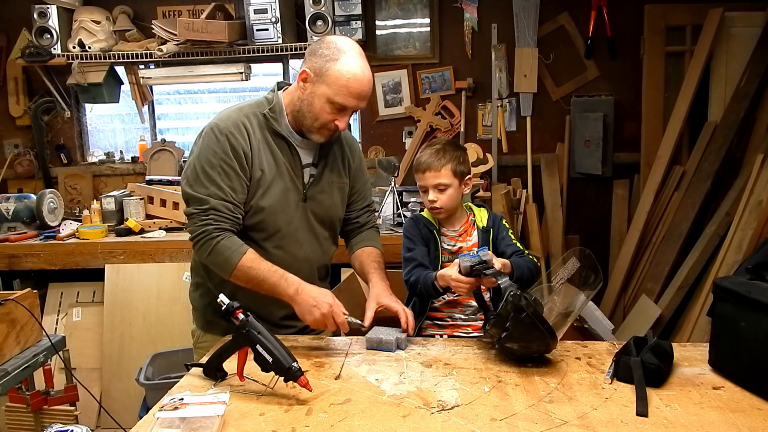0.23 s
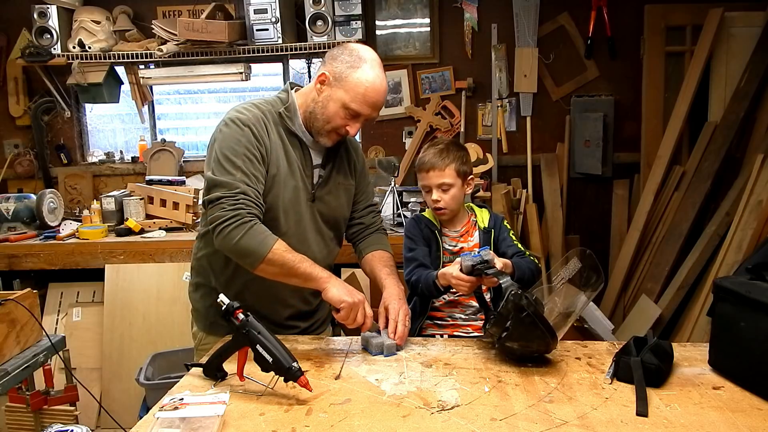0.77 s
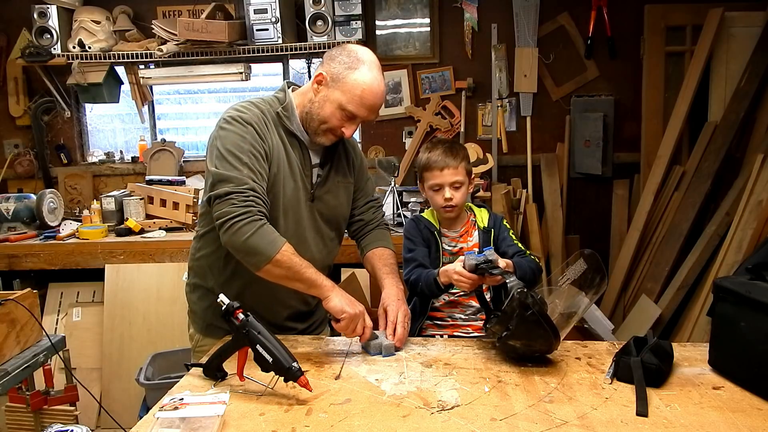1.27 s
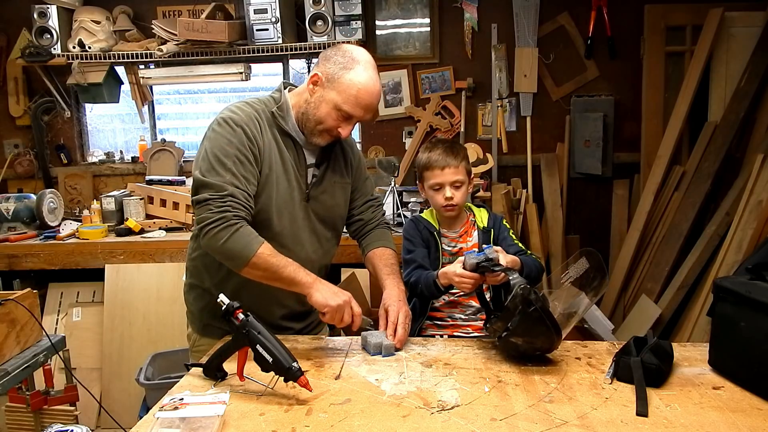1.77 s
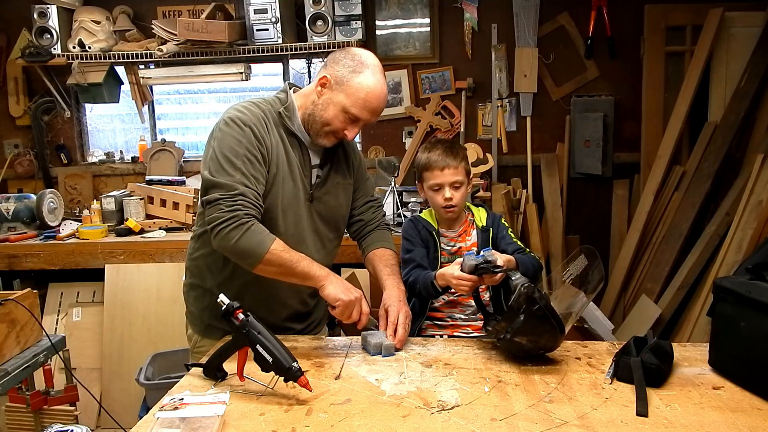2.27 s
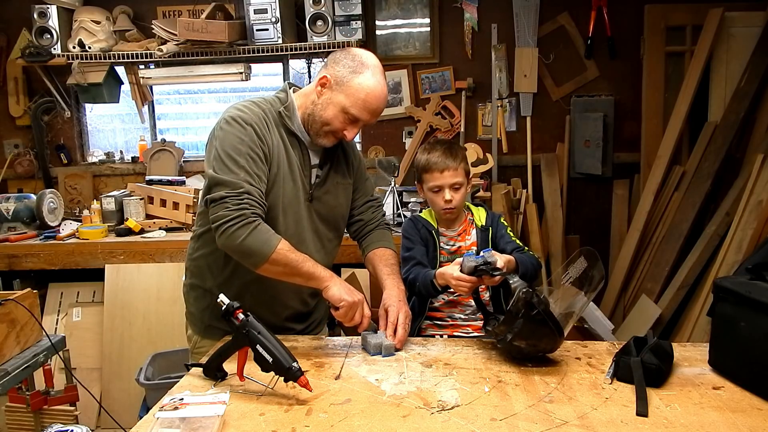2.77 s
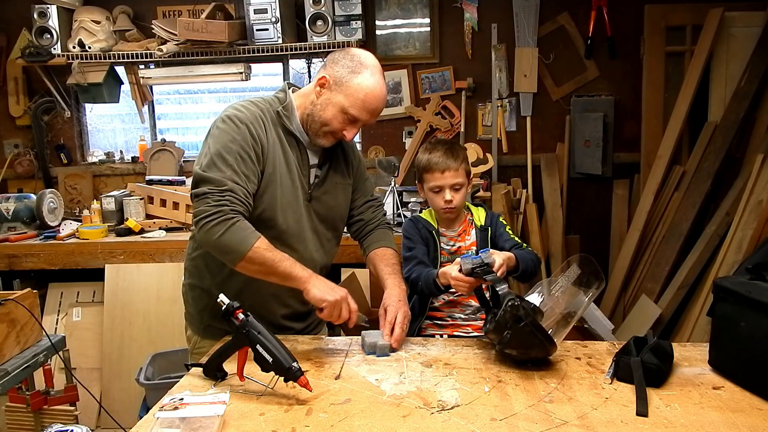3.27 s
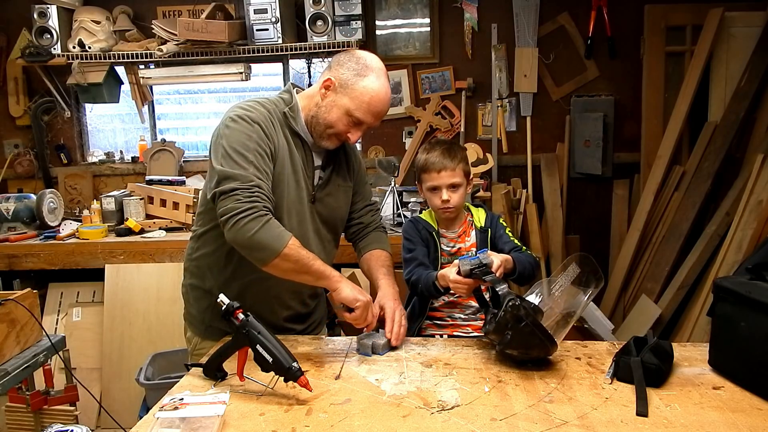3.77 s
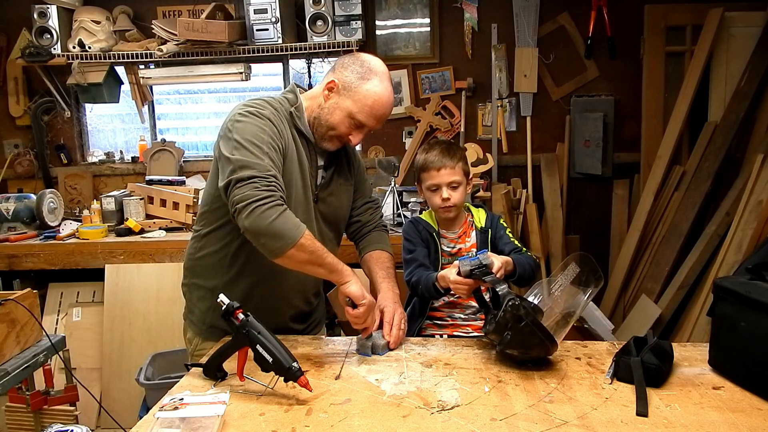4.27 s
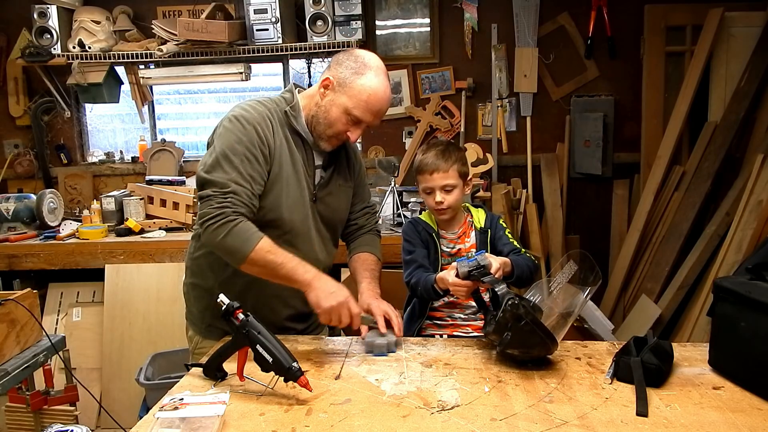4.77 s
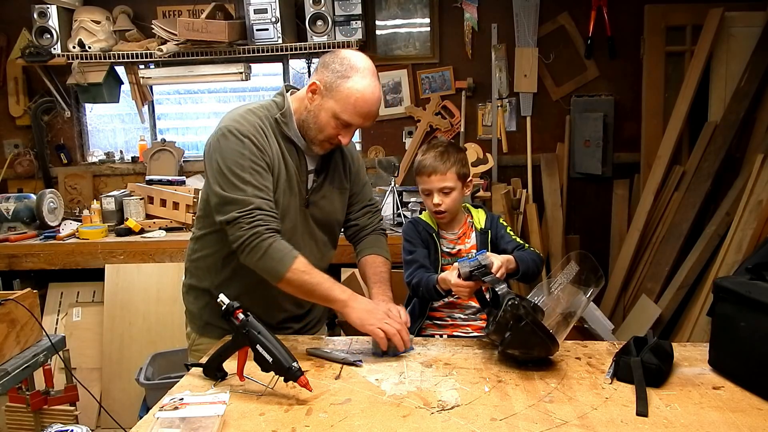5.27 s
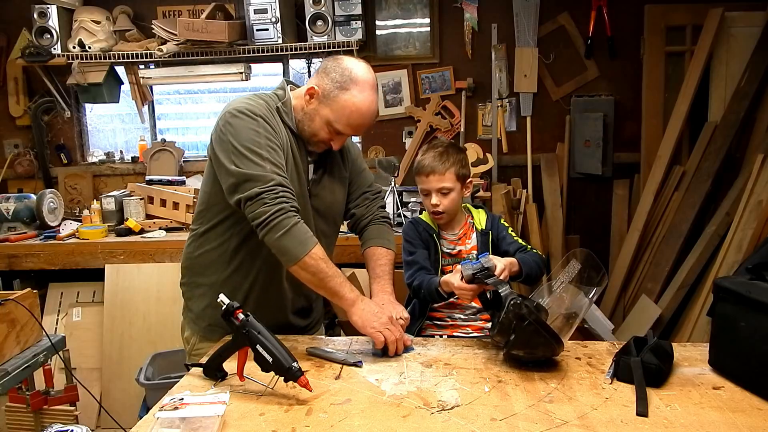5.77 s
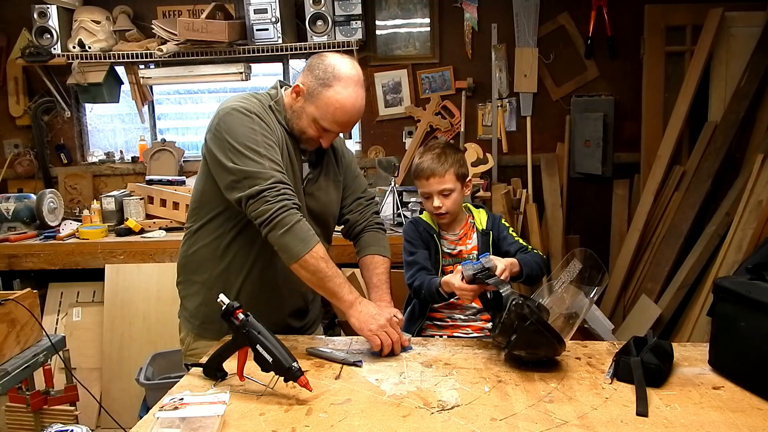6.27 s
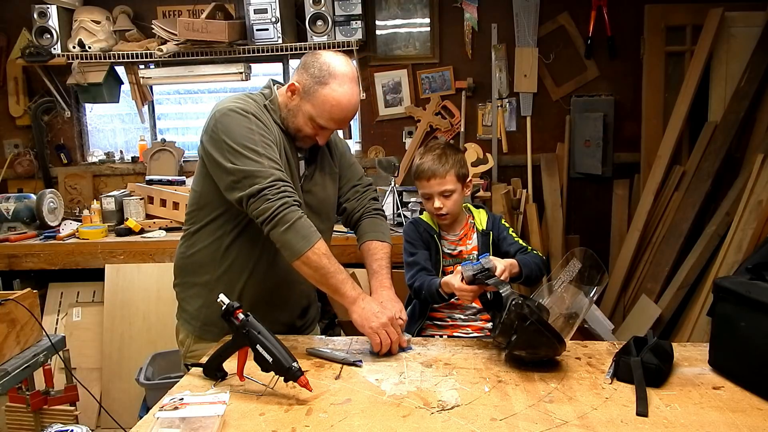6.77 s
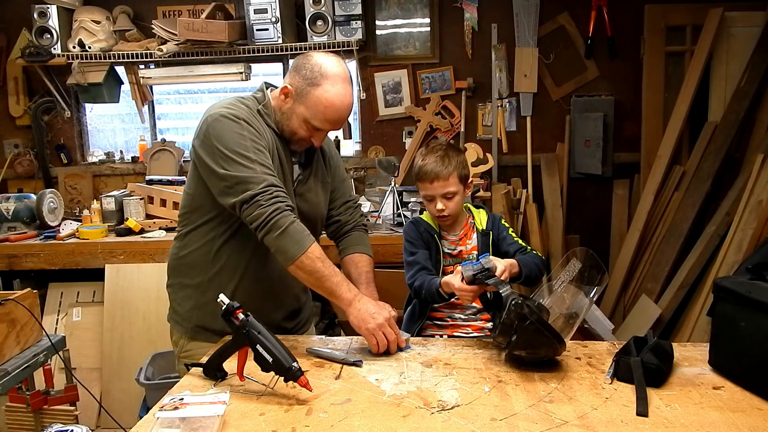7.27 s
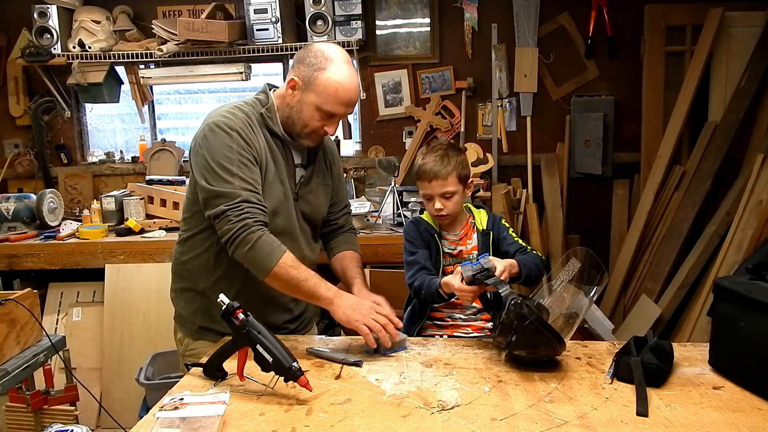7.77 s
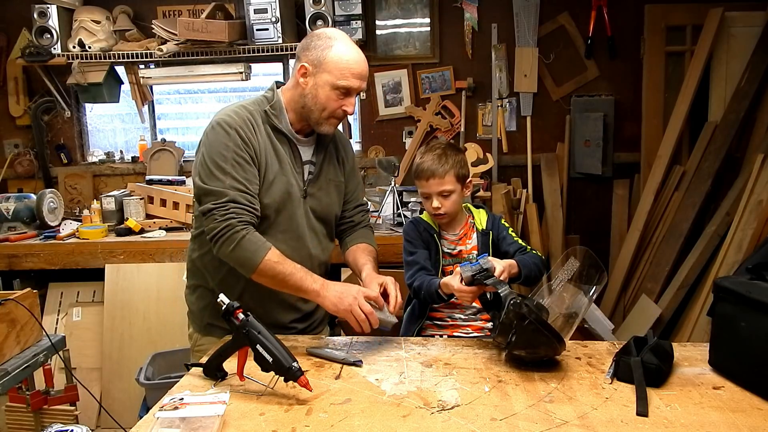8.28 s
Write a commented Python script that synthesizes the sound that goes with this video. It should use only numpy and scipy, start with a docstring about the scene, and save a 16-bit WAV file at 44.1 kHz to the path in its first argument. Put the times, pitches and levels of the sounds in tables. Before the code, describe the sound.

In a small workshop, close stereo microphones catch faint knocks and a brief squeaky scrape as a knife meets packing foam. Short gritty rasps and crisp snaps follow in irregular groups, with dull bench thumps. Around five seconds the knife is dropped with a loud rattling clatter of handle and blade on wood. Hands then crackle and pull the foam apart, with one strong snap, fading to light rustling over quiet room hum.

```python
"""Cutting packing foam

A small workshop with a wooden bench, heard on two close microphones: a knife saws and tears a foam block.
Strokes and snaps are random cell bursts and clicks, coloured as rasp, fizz and thud of the one block.
The knife is put down with a clatter (short pushes into wood and handle), then hands pull the pieces apart.
A thin whistle glides by early; filtered noise and low tones make the quiet air and hum,
and a short tail of sparse random echoes makes the room's answer."""
import sys
import numpy as np
from scipy import signal
from scipy.fft import rfft, irfft
from scipy.io import wavfile
from scipy.ndimage import uniform_filter1d

SR = 44100
rng = np.random.default_rng(int(sys.argv[2]) if len(sys.argv) > 2 else 0)


def int16_out(signal):
    """Quantize to a 16-bit WAV file."""
    q = np.round(np.clip(np.atleast_2d(signal).T, -1, 1) * 32767)
    wavfile.write(sys.argv[1], SR, q.astype(np.int16))


N = 375732
T = np.arange(N) / SR


def amp(db):
    """Turns dB into an amplitude factor."""
    return 10 ** (np.asarray(db) / 20)


def evened(x):
    """Scales to an rms of 1."""
    return x / np.sqrt(np.mean(x ** 2) + 1e-20)


def read(points, hz):
    """Reads a (frequency [Hz], value) table on a log-frequency axis."""
    f, value = np.transpose(points)
    return np.interp(np.log(hz + 1), np.log(f + 1), value)


def over_time(points):
    """Follows a (time [s], level [dB]) table through the scene, as amplitude."""
    return amp(np.interp(T, *np.transpose(points)))


def add(track, s, sound):
    """Mixes a sound into a track at time s."""
    part = track[max(round(s * SR), 0):][:len(sound)]
    part += sound[:len(part)]


def shaped(x, points, share=1):
    """Filters by a (frequency [Hz], gain [dB]) table without delay; share scales the dB."""
    size = x.shape[-1]
    gain = amp(share * read(points, np.fft.rfftfreq(size, 1 / SR)))
    return irfft(rfft(x) * gain, size)


def response(points, size=2048):
    """Causal (minimum-phase) impulse response, of energy 1, with a (frequency [Hz], gain [dB]) colour."""
    log_gain = np.log(amp(read(points, abs(np.fft.fftfreq(size, 1 / SR)))))
    taps = np.fft.ifft(np.exp(np.conj(signal.hilbert(log_gain)))).real
    return taps / np.linalg.norm(taps)


def ring(x, taps):
    """Plays a force through an impulse response."""
    return signal.oaconvolve(x, taps)[:N]


def wander(per_s):
    """Random values of rms 1, per_s of them a second, joined by straight lines."""
    knots = np.arange(0, T[-1] + 1, 1 / per_s)
    return evened(np.interp(T, knots, rng.standard_normal(len(knots))))


def bursts(per_s, spread_db):
    """Cells bursting at random: many small clicks and a few large, of rms 1 overall."""
    at = np.flatnonzero(rng.random(N) < per_s / SR)
    size, sign = rng.random((len(at), 2)).T
    clicks = np.zeros(N)
    clicks[at] = amp(spread_db * np.minimum(-np.log(size), 4)) * np.sign(sign - .5)
    return evened(clicks)


def crack(crumble, crumble_s, size=600):
    """One sharp click with a short crumbling tail of fading noise."""
    force = crumble * rng.standard_normal(size) * np.exp(-np.arange(size) / SR / crumble_s)
    force[0] = 1
    return force


# Spread of the two close microphones: (frequency [Hz], side against middle [dB])
SPREAD_WIDTH = [(60, -16), (250, -8.5), (500, -7), (1000, -5.5), (2000, -2.5), (4000, 0.5), (8000, 0),
                (14000, 1)]


def spread(middle, side):
    """Two close microphones: alike in the bass, unrelated in the treble."""
    side = shaped(side, SPREAD_WIDTH)
    return np.array([middle + side, middle - side])


# Colour of the workshop's steady air: (frequency [Hz], relative density [dB per Hz])
AIR_COLOUR = [(20, -16), (55, 1), (110, 1.5), (160, -8.5), (280, -9.5), (430, -16), (600, -17),
              (780, -14.5), (1000, -19), (1700, -19.5), (2200, -20), (3000, -24.5), (5000, -30),
              (7500, -32), (10000, -29.5), (13000, -31.5), (16000, -43)]
# Rumble of the room, which also carries the hum: (time [s], level [dB])
RUMBLE_LEVEL = [(0, -49.5), (0.8, -52), (1.5, -45), (2.4, -53), (3.1, -47), (3.7, -55), (5.8, -53),
                (8.52, -50)]


def air(hiss_db=-53, split_hz=190, drift_db=0.53):
    """Steady air all around: low rumble under a soft hiss that drifts a little, both filtered noise."""
    noise = shaped(spread(*rng.standard_normal((2, N))), AIR_COLOUR)
    low = signal.sosfiltfilt(signal.butter(3, split_hz, fs=SR, output="sos"), noise)
    rumble = evened(low) * over_time(RUMBLE_LEVEL)
    hiss = evened(noise - low) * amp(hiss_db + drift_db * wander(per_s=3))
    return rumble + hiss


# Low hum somewhere in the workshop: (frequency [Hz], level against the rumble before wavering [dB])
HUM_TONES = [(57, -28), (107, -14.5), (120, -16.5)]


def hum(waver_db=2):
    """Low tones that waver in level and phase and follow the rumble's level."""
    tones = np.zeros(N)
    for hz, db in HUM_TONES:
        level = amp(db + waver_db * wander(per_s=12))
        tones += level * np.sin(2 * np.pi * hz * T + wander(per_s=17))
    return over_time(RUMBLE_LEVEL) * tones


# Fingers and sleeves brushing the foam: (start [s], length [s], level before the rasp and fizz trims [dB])
BRUSH_MOVES = [(0, .025, -54), (.07, .05, -57), (0.469, 0.09, -50.5), (1.196, 0.27, -46),
               (1.545, 0.14, -40.5), (1.962, 0.19, -47.5), (2.178, 0.093, -53), (3.267, 0.23, -52.5),
               (3.83, 0.21, -52.5), (4.46, 0.13, -57), (4.645, 0.3, -51.5), (5.536, 0.55, -53),
               (6.72, 0.12, -56), (6.876, 0.19, -49), (7.377, 0.29, -55), (7.88, 0.6, -56.5),
               (8.047, 0.045, -50.5)]


def brushing(resting_db=-68, speed_power=0.41, grip_db=2.2):
    """Each brush is one arch of hand speed over catching cells; a faint stirring stays between brushes."""
    level = np.full(N, amp(resting_db))
    for s, length_s, db in BRUSH_MOVES:
        speed = abs(np.sin(np.pi * np.arange(0, length_s, 1 / SR) / length_s))
        add(level, s, amp(db) * speed ** speed_power)
    grip = amp(grip_db * wander(per_s=60))
    return level * evened(bursts(per_s=1800, spread_db=4.5) * grip)


def contact(length_s):
    """The smooth push of one blow, of area 1."""
    padded_s = length_s + 2 / SR
    push = np.sin(np.pi * np.arange(1 / SR, padded_s, 1 / SR) / padded_s) ** 2
    return push / push.sum()


def chatter(per_s=700, strength=0.6, settle_s=.006, size=1400):
    """A first impact, then quick small rebounds as the thing rocks and settles."""
    chance, height = rng.random((2, size))
    fade = np.exp(-np.arange(size) / SR / settle_s)
    hits = 2 * strength * (chance < per_s / SR) * (2 * height - 1) * fade
    hits[0] = 1
    return hits


# Knife knocking on the bench:
# (time [s], thud [dB], clack [dB], ring of the handle [dB], tick of the blade [dB]), all before trims
KNIFE_KNOCKS = [(0.062, -50, -28, -62, -70), (0.087, -41, -31, -43, -66), (0.177, -49, -45, -49, -70),
                (1.496, -30, -25.5, -36, -45), (2.038, -43.5, -27, -16.5, -56),
                (3.134, -31.5, -37, -38, -55), (5.003, -23.5, -16, -5.5, -22.5),
                (5.024, -23, -18, -40, -26), (5.076, -23.5, -17.5, -29, -38), (5.166, -25, -24.5, -43, -42),
                (5.191, -27, -34, -31, -46.5), (5.229, -28, -29.5, -36, -44), (5.262, -34, -40, -37, -49.5),
                (5.573, -74, -42, -36.5, -63)]
# Heavy pushes and soft thumps on the bench:
# (time [s], thud of the top before its trim [dB], shudder of the frame [dB])
BENCH_THUMPS = [(1.491, -39, -31), (3.125, -37, -34.5), (3.158, -36.5, -45), (4.236, -37.5, -53),
                (5.004, -31, -43), (5.11, -33, -55), (5.206, -37, -52), (5.492, -51, -69),
                (7.087, -42, -46), (7.327, -43, -60), (7.495, -50, -66), (7.759, -50.5, -63),
                (8.123, -48.5, -52)]
# Thud of the bench, under blows and pushes: (frequency [Hz], gain [dB])
THUD_COLOUR = [(40, -32), (100, -21), (160, -8.5), (220, -7), (290, 0.5), (400, -6.5), (600, -12),
               (1200, -19.5), (4000, -76), (16000, -90)]
# Wood struck by the knife: (frequency [Hz], gain [dB])
CLACK_COLOUR = [(100, -24), (400, -14.5), (620, -5.5), (820, -3), (1000, -3.5), (1300, -4), (1800, -15),
                (3000, -14), (9000, -47), (16000, -78)]
# Knife handle ringing: (frequency [Hz], gain [dB])
HANDLE_COLOUR = [(200, -31), (1000, -15), (1550, -8.5), (1950, 3.5), (2250, -2), (2700, -20), (3600, -13),
                 (5500, -19.5), (10000, -26), (13000, -29), (16000, -67)]


def knocks(thud_db=25.5, clack_db=21.0, handle_db=20.0, size=2048):
    """A blow rings the handle, then clacks and thuds in the heavier top; thumps only thud. Gives three parts."""
    lags_s = (.003, .002, .001)  # thud, clack, handle
    hardest_db, soft_s, thump_s = -3.5, 0.00044, 0.0014  # briefest-contact level, longest knife and thump contact
    top_hz, top_t60, top_db = 292, 0.13, -36  # lowest clear mode of the bench top
    blows, t = np.zeros((3, N)), np.arange(size) / SR
    for s, *parts_db, _ in KNIFE_KNOCKS:
        # softer blows stay longer in contact, so they are duller
        hardness = amp(min(max(parts_db) - hardest_db, 0))
        push = contact(soft_s * (1 - hardness))
        rattle = np.convolve(push, chatter())
        for blow, db, lag_s, force in zip(blows, parts_db, lags_s, (push, rattle, push)):
            add(blow, s + lag_s, amp(db) * force)
    for s, db, _ in BENCH_THUMPS:
        thump = np.convolve(contact(thump_s), chatter(per_s=500, strength=0.52, settle_s=0.017))
        add(blows[0], s, amp(db) * thump)
    top = amp(top_db - 60 * t / top_t60) * np.cos(2 * np.pi * top_hz * t)
    bodies = response(THUD_COLOUR, size=size) + top, response(CLACK_COLOUR), response(HANDLE_COLOUR)
    trims_db = thud_db, clack_db, handle_db
    return [amp(db) * ring(blow, body) for blow, body, db in zip(blows, bodies, trims_db)]


def blade_ticks(level_db=15, lag_s=0.0017):
    """The thin blade chatters brightly on the wood at each knock: a click and crumbling noise, coloured."""
    # (frequency [Hz], gain [dB])
    colour = [(300, -28), (1500, 3), (3500, 3.5), (6000, -3), (9000, 0), (12500, -1.5), (16000, -25)]
    force = np.zeros(N)
    for s, *_, db in KNIFE_KNOCKS:
        add(force, s + lag_s, amp(level_db + db) * crack(crumble=.25, crumble_s=0.0073))
    return ring(force, response(colour))


# Faint, thin whistle: (time [s], frequency before its flutter [Hz], level before its trim [dB])
WHISTLE_GLIDE = [(0.24, 9300, -79), (0.31, 10400, -60), (0.44, 11700, -65), (0.52, 12500, -75),
                 (0.58, 11500, -63), (0.63, 11400, -61), (0.70, 9950, -62), (0.78, 9700, -68),
                 (0.86, 8500, -70)]


def whistle(level_db=3, flutter=0.00097):
    """One sine glides up and down again, its pitch fluttering slightly."""
    s, hz, db = np.transpose(WHISTLE_GLIDE)
    pitch = np.interp(T, s, hz) * (1 + flutter * wander(per_s=100))
    turns = np.cumsum(pitch) / SR
    level = amp(level_db + np.interp(T, s, db, left=-150, right=-150))
    return level * np.sin(2 * np.pi * turns)


def scrape(level_db=-39, middle_s=.361, swell_s=0.0082):
    """The flat of the blade chirps briefly on the foam: coloured bursts that swell and die exponentially."""
    # (frequency [Hz], gain [dB])
    colour = [(500, -20), (1700, -4), (2200, 3), (3100, -4.5), (4200, -15), (8000, -17), (12000, -15), (16000, -27)]
    level = amp(level_db) * np.exp(-abs(T - middle_s) / swell_s)
    return ring(level * bursts(per_s=5700, spread_db=5.0), response(colour))


# Single cell walls snapping: (time before a small lag [s], rasp before its trim [dB], fizz before its trim [dB])
WALL_SNAPS = [(0.994, -28.5, -28), (1.032, -36, -29), (1.04, -18.5, -22), (1.074, -21.5, -24.5),
              (1.346, -26.5, -30), (1.593, -34, -28.5), (2.007, -40, -32.5), (2.039, -24, -23),
              (2.245, -52, -41), (2.591, -49.5, -43.5), (2.773, -42.5, -34), (2.825, -42, -36.5),
              (2.844, -38, -37), (2.862, -40, -31), (2.867, -25, -21), (2.892, -25, -23), (2.98, -30, -37),
              (3.093, -21.5, -31), (3.544, -48, -46), (3.828, -31, -28), (3.915, -49, -38.5),
              (3.978, -41, -31), (4.001, -47, -29.5), (4.241, -20, -24), (4.265, -24.5, -21),
              (4.608, -40.5, -36.5), (5.542, -41.5, -43), (5.734, -31, -35), (5.804, -36.5, -47),
              (5.888, -36, -33.5), (6.105, -33.5, -37.5), (6.213, -37, -45), (6.258, -37, -35),
              (6.283, -32, -26.5), (6.682, -49, -46), (6.758, -34.5, -44), (6.835, -35, -52),
              (6.847, -31.5, -51), (7.045, -37, -55), (7.065, -23, -39), (7.245, -36, -48),
              (7.444, -59, -41.5)]


def snaps(rasp_db=18, fizz_db=15, lag_s=.001):
    """Each snap is one sharp click with a short crumbling tail; gives the forces behind rasp and fizz."""
    forces = np.zeros((2, N))
    for s, *parts_db in WALL_SNAPS:
        snap = crack(crumble=0.14, crumble_s=0.0023)
        for force, db in zip(forces, parts_db):
            add(force, s + lag_s, amp(db) * snap)
    return forces * amp([[rasp_db], [fizz_db]])


# Strokes through the foam:
# (start [s], swell [s], release [s], rasp of the block [dB], fizz of its cells [dB], push on the bench [dB]),
# levels before trims
FOAM_STROKES = [(1.0, 0.032, 0.092, -47, -43, -38), (1.27, 0.033, 0.027, -35.5, -35, -50),
                (1.345, 0.0095, 0.023, -31, -36, -41), (1.457, 0.016, 0.051, -23.5, -25.5, -24.5),
                (1.59, 0.022, .05, -36, -41, -40.5), (1.685, 0.018, 0.026, -41, -43.5, -55),
                (2.835, 0.04, 0.054, -32.5, -40, -36.5), (2.974, 0.0062, 0.074, -38.5, -39, -59),
                (3.005, 0.082, 0.055, -25, -29, -33.5), (3.31, 0.1, 0.028, -41, -44.5, -44.5),
                (4.236, 0.0084, 0.03, -21, -27, -46), (5.785, 0.041, 0.12, -43, -47, -68),
                (5.909, 0.019, 0.072, -44, -51, -46), (6.219, 0.018, 0.12, -47, -40, -67),
                (6.464, 0.037, 0.096, -43.5, -45.5, -71), (6.675, 0.027, 0.047, -42.5, -49, -45.5),
                (6.832, .01, 0.063, -41, -48, -49), (6.9, 0.054, 0.088, -43.5, -52, -69),
                (7.06, 0.0058, 0.077, -23.5, -27, -32.5), (7.236, .008, 0.079, -42, -45, -45)]


def strokes(rasp_db=-1.5, fizz_db=-3.0, push_db=-5, clump_db=4.0):
    """The blade sticks and slips, so cells burst in clumps; gives the forces behind rasp, fizz and thud."""
    grow_db, die_db = 13.5, 24.5  # rise until the foam gives, then fall
    lags_s = (0, 0, 0.022)  # the bench takes the force just after the foam gives
    cells = bursts(per_s=6000, spread_db=3.0) * amp(clump_db * wander(per_s=600))
    # evens out the level of the random bursts
    cells /= np.sqrt(uniform_filter1d(cells ** 2, size=900) + 1e-9)
    levels = np.zeros((3, N))
    for s, swell_s, release_s, *parts_db in FOAM_STROKES:
        t = np.arange(0, swell_s + release_s, 1 / SR)
        swell_db = grow_db * (t / swell_s - 1)
        release_db = -die_db * ((t - swell_s) / release_s) ** 2
        effort_db = np.where(t < swell_s, swell_db, release_db)
        for level, db, lag_s in zip(levels, parts_db, lags_s):
            add(level, s + lag_s, amp(db + effort_db))
    return cells * levels * amp([[rasp_db], [fizz_db], [push_db]])


# Resonances of the block pressed on the bench: (frequency [Hz], width [Hz], relative level [dB])
BLOCK_MODES = [(790, 100, -29), (973, 7.3, -0.5), (1260, 12, -13), (1382, 32, 11.5), (1693, 16, 8.5),
               (2280, 74, 3)]


def block_ring(size=2048):
    """The brief ringing of the block as decaying sines, with energy 1."""
    t = np.arange(size) / SR
    modes = np.zeros(size)
    for hz, width_hz, db in BLOCK_MODES:
        modes += amp(db) * np.exp(-np.pi * width_hz * t) * np.sin(2 * np.pi * hz * t)
    return modes / np.linalg.norm(modes)


# Rasp of the torn block: (frequency [Hz], gain [dB])
RASP_COLOUR = [(100, -18.5), (400, -11), (550, -2.5), (750, -1.5), (1000, -4.5), (1400, -0.5), (1900, 0),
               (2500, -5), (3000, -2.5), (4000, -8), (5500, -14), (8000, -17.5), (16000, -50.5)]
# Fizz of its cells: (frequency [Hz], gain [dB])
FIZZ_COLOUR = [(300, -38.5), (1500, -9), (3500, 1), (5000, -2), (6800, -1.5), (7500, -2), (8300, 2.5),
               (10500, 2.5), (12500, -2.5), (14500, -9.5), (16000, -62.5)]
# How firmly the hands press the block on the bench, which makes it ring: (time [s], level [dB])
HAND_PRESS = [(0, -30), (4.0, -22), (4.25, -16), (5.5, -32), (6.9, -14.5), (7.07, -2), (7.2, -32),
              (7.4, -19), (8.52, -29)]


def foam(brush_rasp_db=-4, brush_fizz_db=-6, thud_db=-0.5):
    """Strokes, snaps and light brushing all sound through the same block."""
    cut_rasp, cut_fizz, push = strokes()
    snap_rasp, snap_fizz = snaps()
    brush = brushing()
    rasp_force = cut_rasp + snap_rasp + amp(brush_rasp_db) * brush
    fizz_force = cut_fizz + snap_fizz + amp(brush_fizz_db) * brush
    rasp = ring(rasp_force, response(RASP_COLOUR))
    ringing = ring(rasp_force * over_time(HAND_PRESS), block_ring())
    fizz = ring(fizz_force, response(FIZZ_COLOUR))
    thud = amp(thud_db) * ring(push, response(THUD_COLOUR))
    return rasp + ringing + fizz + thud


# Modes of the bench's frame: (frequency [Hz], relative level [dB], time to fall 60 dB [s])
FRAME_MODES = [(111.3, -8, 0.41), (158.5, -3, 0.42), (224, -1.5, 0.46), (265, 0, 0.28)]


def shudders(rise_s=0.0047, size=22000):
    """A heavy push sets the low modes of the bench's frame swinging."""
    t, out = np.arange(size) / SR, np.zeros(N)
    swing = sum(amp(db - 60 * t / t60) * np.sin(2 * np.pi * hz * t) for hz, db, t60 in FRAME_MODES)
    swing = swing * (1 - np.exp(-t / rise_s))
    for s, _, db in BENCH_THUMPS:
        add(out, s, amp(db) * swing)
    return out


def mirrored(x, strength=0.71, delay_s=.0027, corner_hz=700, shift=0.071):
    """The bench top throws the treble back at once; the delay wanders randomly, which softens the comb colour."""
    treble = signal.sosfilt(signal.butter(1, corner_hz, "high", fs=SR, output="sos"), x)
    at = np.arange(N) - np.round(SR * delay_s * (1 + shift * wander(per_s=40)))
    return x + strength * np.interp(at, np.arange(N), treble, left=0)


# Decay of the small workshop: (frequency [Hz], time to fall 60 dB [s])
ROOM_DECAY = [(150, 0.19), (400, 0.2759), (1000, 0.4369), (1800, 0.3926), (3000, 0.35), (8000, 0.3427),
              (15000, 0.21)]


def room(x, build_s=0.0013, cycle_hz=0.4386, size=24576):
    """Cluttered walls return a short dense tail; two random echo patterns trade places in a slow steady cycle."""
    taps = rng.standard_normal((2, 2, size)) * (rng.random((2, 2, size)) < .15)  # 15 % of samples echo
    hz, t, z = signal.stft(taps, SR, nperseg=256)
    decay = amp(-60 * t / read(ROOM_DECAY, hz)[:, None])
    tails = signal.istft(z * decay, SR, nperseg=256)[1]
    tails = tails * (1 - np.exp(-np.arange(tails.shape[-1]) / SR / build_s))
    turn = 2 * np.pi * cycle_hz * T
    wet = np.zeros((2, N))
    for share, tail in zip((np.cos(turn), np.sin(turn)), tails):
        pair = spread(*tail / np.linalg.norm(tail[0]))
        wet += signal.oaconvolve((x * share)[None], pair, axes=1)[:, :N]
    return wet


def scene(foam_wet_db=-1.0, bench_wet_db=-3, handle_wet_db=-7.0, whistle_wet_db=-9):
    """Foam and bench top fill the room; the handle's ring and the whistle come mostly straight."""
    cutting, tone = foam() + scrape() + blade_ticks(), whistle()
    thud, clack, handle = knocks()
    sent = amp(foam_wet_db) * cutting + amp(bench_wet_db) * (thud + clack)
    sent += amp(handle_wet_db) * handle + amp(whistle_wet_db) * tone
    direct = mirrored(cutting + clack) + thud + handle + tone + shudders()
    return direct + room(sent) + air() + hum()


def gain_control(x, threshold_db=-17, share=0.54, recover_db_per_s=9, attack_s=0.0049):
    """The recorder turns down quickly at a loud blow and creeps back up."""
    power_db = 10 * np.log10(abs(uniform_filter1d((x ** 2).mean(0), size=200)) + 1e-12)
    recovery = recover_db_per_s * T  # the held peak sinks at this rate; the gain follows by its share
    held_db = np.maximum.accumulate(power_db + recovery) - recovery
    over_db = np.maximum(held_db - threshold_db, 0)
    keep = np.exp(-1 / (attack_s * SR))
    return x * amp(-share * signal.lfilter([1 - keep], [1, -keep], over_db))


# Colour difference of the two microphones: (frequency [Hz], left minus right [dB])
MICROPHONE_BIAS = [(60, 0.5), (500, 1.3), (1000, 1.2), (2000, 1), (8000, -0.6), (13000, 0.3)]


def record(dry, ceiling=.8, edge_hz=15900):
    """Two microphones of slightly different colour, gain control, soft rounding of peaks, then a band limit."""
    pair = np.array([shaped(dry[0], MICROPHONE_BIAS, .5), shaped(dry[1], MICROPHONE_BIAS, -.5)])
    pair = ceiling * np.tanh(gain_control(pair) / ceiling)
    low_pass = signal.firwin(255, edge_hz, window=("kaiser", 9), fs=SR)
    return signal.oaconvolve(pair, low_pass[None], "same")


dry = scene()
out = record(dry)
int16_out(out)
```